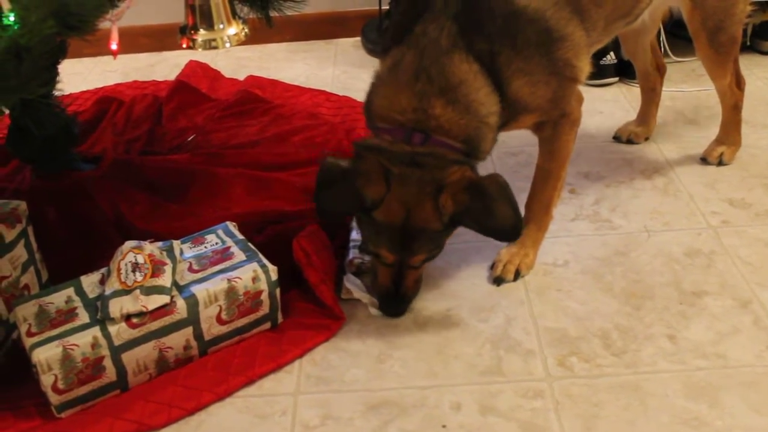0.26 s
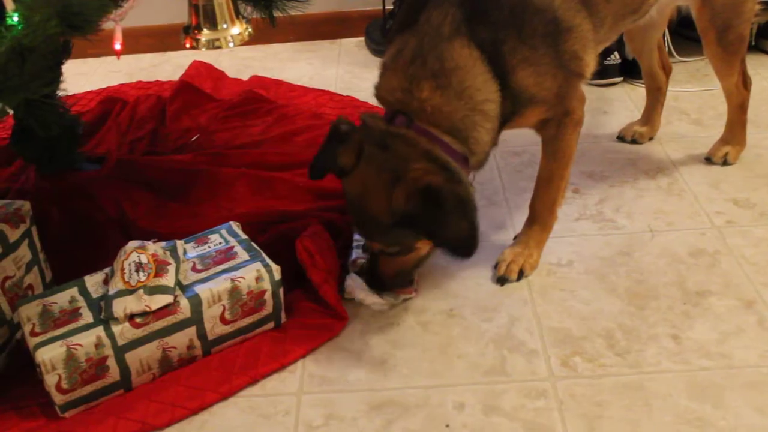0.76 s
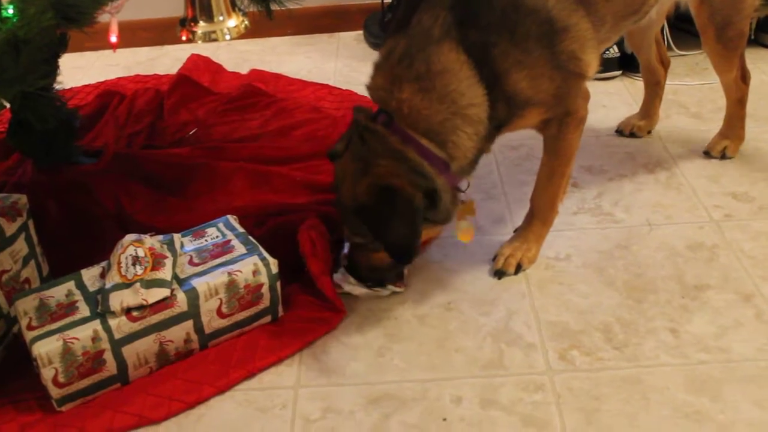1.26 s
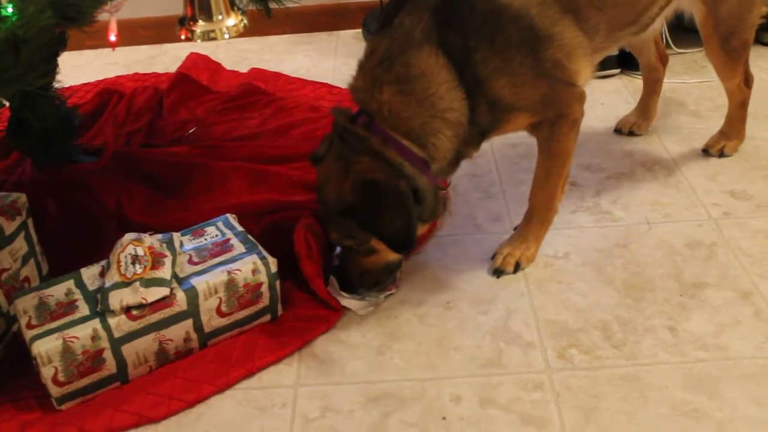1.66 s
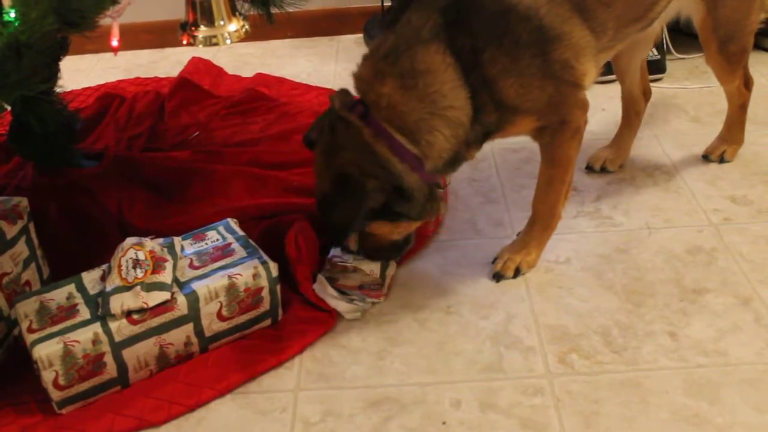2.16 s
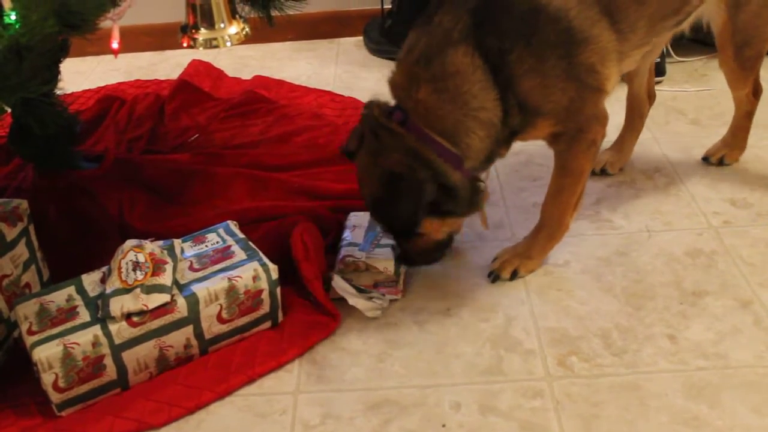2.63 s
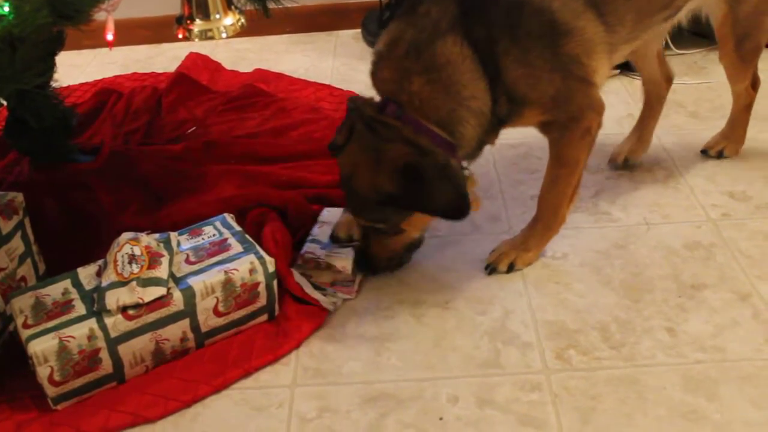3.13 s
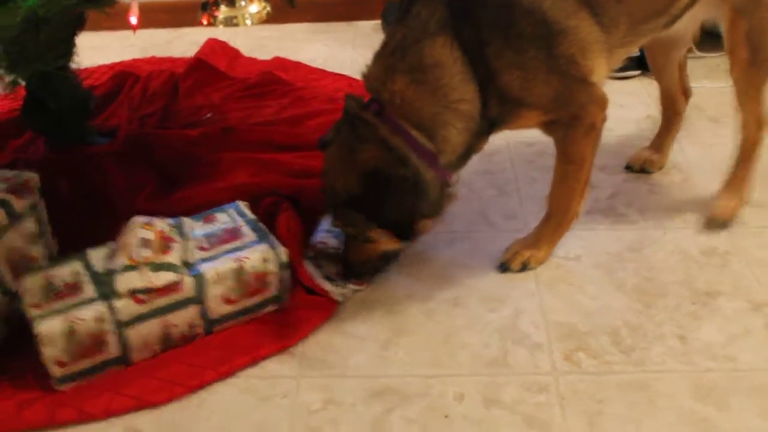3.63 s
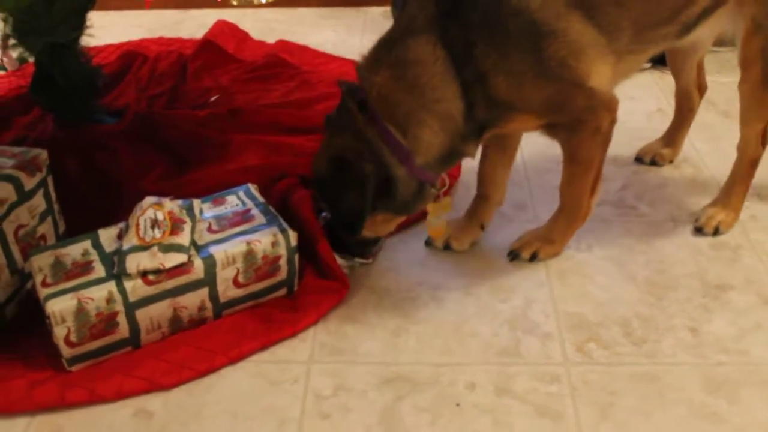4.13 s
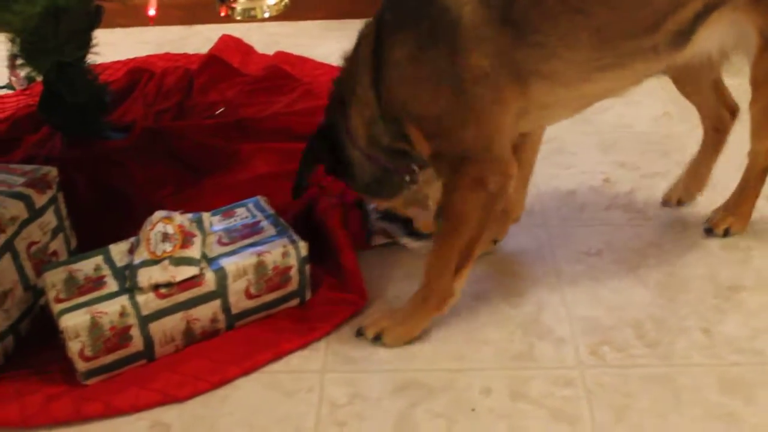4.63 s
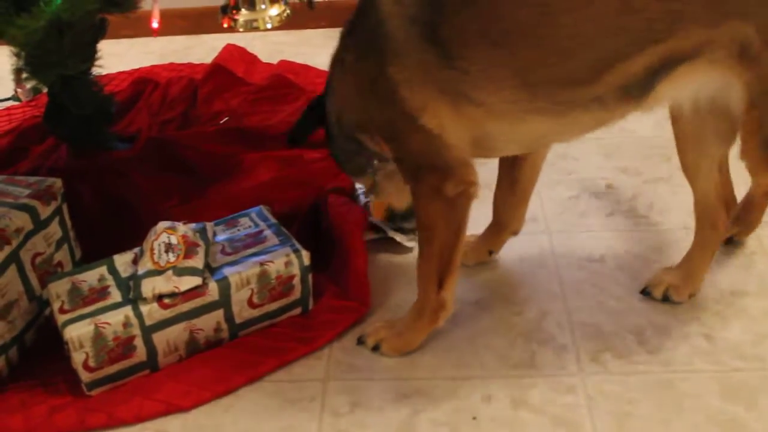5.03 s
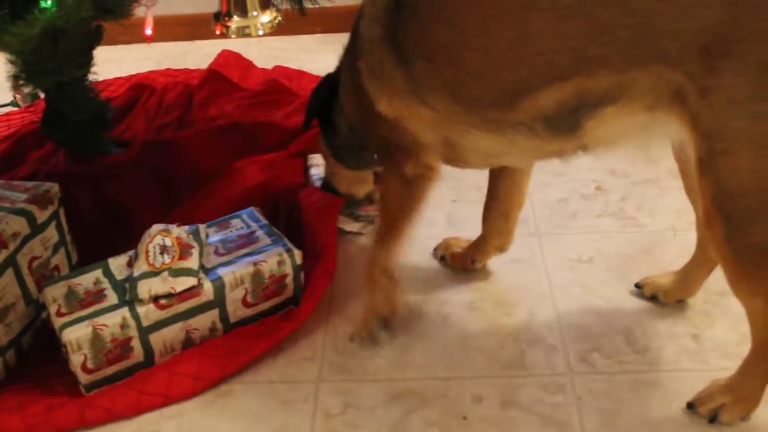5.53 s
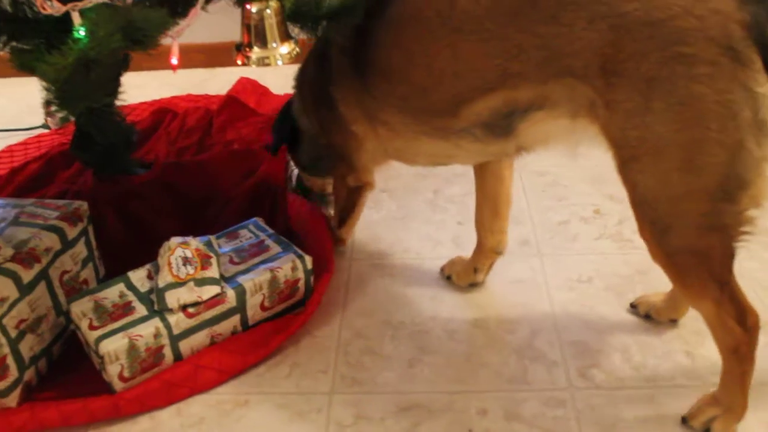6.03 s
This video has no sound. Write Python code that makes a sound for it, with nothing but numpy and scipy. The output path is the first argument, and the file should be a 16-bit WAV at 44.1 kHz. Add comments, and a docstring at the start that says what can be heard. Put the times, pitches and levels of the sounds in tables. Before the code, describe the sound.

Close in a hard, tiled room, a dog worries a wrapped gift. Faint ticks come first, then a crisp burst of paper snaps, a much louder hard pop, and looser crackles and rustles. Tiny collar tags clink brightly between them, with a few soft low thumps. Short echoes follow, over quiet room air and faint hum.

```python
"""Paper snaps and crinkles as a dog noses and bites a wrapped parcel on a tiled floor. Each snap is an impulse
with a floor reflection, a noise rattle and a panel resonance; crinkle is a random train of tiny folds. Two
metal collar tags clink as damped modes, and soft low thumps sound. A hard room adds distinct echoes and a tail
of nearly half a second, over filtered-noise hush and mains hum."""
import sys
import numpy as np
from scipy import signal
from scipy.fft import rfft, irfft
from scipy.io import wavfile

SR = 44100
rng = np.random.default_rng(int(sys.argv[2]) if len(sys.argv) > 2 else 0)


def dump(signal):
    """Clip the signal to [-1, 1] and save it as 16-bit WAV at the path in sys.argv[1]."""
    limited = np.clip(np.atleast_2d(signal).T, -1, 1)
    pcm = np.round(limited * 32767).astype(np.int16)
    wavfile.write(sys.argv[1], SR, pcm)


N = 276948  # samples

# Paper snaps, knocks of the parcel and dry ticks: t/s, direct peak/dB, ring f/Hz, ring share/dB,
# bass slope (positive thins the bass)/dB per octave, treble slope/dB per octave, room send/dB
SNAP_EVENTS = [(.0044,-33.5,990,-12,-6,-24,7.5),(.168,-38.5,530,-12.5,9,-4,5),(.381,-42,2020,-1,0,4.5,-3),(.410,-36,3540,-10,-5,14,-7),(.4294,-41,1130,-6,-10,-2,7),(.627,-38,437,-10,-11,-13,-1),(0.6385,-45,1150,3,1,-22,7),(.6866,-41,1210,-10,-5,11,5),(.7544,-36.5,649,-21,4,7,6),(.8854,-34.5,960,-8,4,10,-10),(1.002,-31.5,750,-5.5,-13,15,8),(1.1914,-42,1970,0,1,7,-1),(1.2433,-26,2900,-19,22,3,11.5),(1.2504,-35,4470,-16,5,2,-6),(1.2647,-29,2300,-14,6,9.5,7),(1.3846,-34.5,2800,0,9,13,-8),(1.4098,-30.5,2320,-9,22,0.5,7),(1.419,-28,3200,4,16,11.5,2.5),(1.5503,-12.5,2210,-18,11,3.5,13.5),(1.5654,-10.5,4580,-6,-2,2,13.5),(1.5784,-10,2870,-15,-2,6,10.5),(1.5868,-17,1110,-5.5,5,-3,2),(1.6104,-17.5,3600,-18,5,9,3.5),(1.8154,-43,1230,-14,4,4,14),(1.8534,-24,2300,-30,8,6,4),(1.8843,-30.5,3470,-30,10,6,16),(1.9566,-29.5,2790,-14,13,3,4),(1.9668,-35,2970,-18,10,6,3),(2.0452,-29,730,-21.5,-1,3,11),(2.2726,-32.5,4100,7.5,-8,14.5,9.5),(2.2888,-31.5,527,-14,-8,0,8),(2.3071,-32,2320,-17,2,0,10),(2.3181,-25,2300,-6,-6,10,4),(2.378,-27,960,-11,-1,-15,9),(2.3936,-12.5,1140,-5.5,-7.5,7,13),(2.4253,4,906,-15.5,-3,-1,-1.5),(2.4338,-8.5,3070,1.5,1,-9,6),(2.4475,-7,895,-20,1.5,-17,13.5),(2.6294,-32.5,884,-16,-1,-1,13.5),(2.7437,-28.5,3400,-2,15,0,6),(2.8877,-27,3770,4,2,3,6),(2.9583,-35.5,1870,-1,1,-10,-8),(3.0751,-26,701,-12,4,-4,7),(3.079,-17.5,947,-8,-9,1.5,4),(3.0953,-16.5,980,4,-13,16,0.5),(3.1132,-15,920,-14,3,5,5),(3.1576,-8.5,1960,-18.5,2,-12,6),(3.2374,-31,1650,-11,3,0,10),(3.2895,-25.5,3500,-5,-5,0,5.5),(3.3609,-14.5,506,-15,-8,1,6.5),(3.4074,-30,1260,-2,-1,-15,-2),(3.4639,-47,482,-20,2,-5,4),(3.5444,-39.5,523,-19,4,7,19.5),(3.681,-35.5,3100,-9,-1,1,13),(3.7579,-29,736,-19,-6,-13,0),(3.7883,-30,853,-8,-28,-5,-22),(3.7978,-26.5,1630,-3,-9,-10,-31),(3.898,-28,1750,-16.5,3,-4,-12),(3.955,-42.5,705,-11.5,-10.5,-11,13.5),(4.1414,-31,3630,-8,6,-9,15),(4.151,-15,1790,-18,11,-7.5,8),(4.1659,-23.5,2300,-10,3,-5,5),(4.4378,-39,2360,-22,0,-19,18.5),(4.4632,-25.5,1930,-20,7,-10,11),(4.6468,-38,1300,-11,1,-7,-2),(4.7208,-14.5,2170,-35,-5,4.5,7),(4.9114,-47,2780,-5.5,3,-7,15.5),(5.1887,-26,1790,-24,23,-5,14),(5.3201,-57,2850,-10,-2,-8,12),(5.6342,-32,1560,-20,6,2,10),(5.656,-21,1910,-14,-3,-3.5,10.5),(5.6749,-22.5,2350,-33,-2,1,3),(5.8188,-33,4500,-12,5,8,-1),(5.8312,-22,3440,-21,0,8,-13),(5.848,-28,4540,-26,10,6,-1),(5.8939,-34,2560,-6.5,-11,7,15),(5.9369,-25,3440,-11,-1,3,3),(5.9418,-12.5,3470,-5.5,5,-3,1),(6.108,-46,3460,-15,2,7,0),(6.136,-29.5,3500,-20,3,7,18)]
NEUTRAL_HZ = 2500  # pivot of every spectral tilt


def undb(db):
    """Level to amplitude ratio: 20 dB is a factor of ten."""
    return 10 ** (np.asarray(db) / 20)


def unit(x):
    """Normalise the signal power: rms 1."""
    return x / np.sqrt(np.mean(x ** 2))


def band(x, hz, width_hz):
    """Band-pass filter whose edges lie geometrically about the centre."""
    low = np.sqrt(hz ** 2 + width_hz ** 2 / 4) - width_hz / 2
    high = min(low + width_hz, .45 * SR)
    return signal.sosfilt(signal.butter(2, [low, high], "bandpass", fs=SR, output="sos"), x)


def add(track, s, piece):
    """Linear superposition of a piece on the track, starting at s seconds."""
    i = max(int(s * SR), 0)
    track[i:i + len(piece)] += piece[:N - i]


def tilt(hz, per_octave_db):
    """Spectral tilt: level change in dB, linear in octaves from the neutral pitch."""
    return per_octave_db * np.log2(hz / NEUTRAL_HZ)


def two_slope_tilt(hz, bass_slope, treble_slope):
    """Spectral tilt with separate slopes below and above the neutral pitch."""
    return tilt(hz, bass_slope if hz < NEUTRAL_HZ else treble_slope)


def snaps(floor_ms=1.36, floor_db=-18.0, ring_q=4.36):
    """Impulsive release, tile reflection, rattle and panel resonance; returns direct sound and room send."""
    # Pass bands of a snap: f/Hz, width/Hz
    snap_bands = [(370, 280), (810, 2640), (1700, 2180), (3300, 2620), (6400, 2940), (12000, 36000)]
    # Share of each band before tilt: level/dB
    snap_shares = [-40, -20.5, -7, -5, -10, -11]
    rattle, rattle_ms = .5, 1.6  # amplitude share, time to fall by 1 / e
    direct, room_send = np.zeros(N), np.zeros(N)
    t = np.arange(2048) / SR
    bounce = int(floor_ms * SR / 1000)
    noises = rng.standard_normal((len(SNAP_EVENTS), len(t)))
    for event, noise in zip(SNAP_EVENTS, noises):
        s, db, ring_hz, ring_db, bass_slope, treble_slope, send_db = event
        # dividing by the root of the envelope's energy makes the share independent of rattle length
        kick = rattle * noise * np.exp(-t * 1000 / rattle_ms) / np.sqrt(rattle_ms * SR / 2000)
        kick[[0, bounce]] += np.sign(noise[0]) * undb([0, floor_db])
        snap = np.zeros(len(t))
        for k, ((hz, width), share_db) in enumerate(zip(snap_bands, snap_shares)):
            # alternating signs join neighbouring bands without a hole
            sign = (-1) ** k
            # narrow bands need more gain for the same peak
            gain = undb(share_db + two_slope_tilt(hz, bass_slope, treble_slope)) / width
            snap += sign * gain * band(kick, hz, width)
        snap += undb(ring_db) * ring_q / ring_hz * band(kick, ring_hz, ring_hz / ring_q)
        snap *= undb(db) / np.max(np.abs(snap))
        add(direct, s, snap)
        add(room_send, s, snap * undb(send_db))
    return direct, room_send


def crinkle(most_db=9.0):
    """Random impulse train: dense folds of exponentially scattered level excite the paper's bands."""
    # Fold activity before band shares: t/s, level/dB, spectral slope/dB per octave
    activity = [(0,-64,-6),(.3,-67,-2.8),(.63,-62,-2.7),(1.0,-60.5,-1),(1.2,-63,-1),(1.75,-59,-0.5),(2.239,-73.5,-7),(2.85,-59,-3.5),(3.5,-50.5,-1),(3.84,-64,-2.5),(4.1,-53.5,1),(4.42,-58,-0.5),(4.75,-53,-0.5),(4.96,-63,-4),(5.4,-51.5,0.5),(5.75,-57,0.5),(6.12,-46,0.5),(6.28,-44.5,-1.5)]
    # Pass bands of folding: f/Hz, width/Hz, rate/folds per second, mean scatter of size/dB
    fold_bands = [(2620, 3350, 1500., 2.5), (860, 1070, 900., 0.5), (7500, 4700, 900., 0.5),
                  (337, 276, 540, 2.5), (9300, 8300, 72, 24)]
    # Share of each fold band: level/dB
    fold_shares = [-1, -3.5, -7.5, -12.5, -16]
    s, db, slope = np.transpose(activity)
    t, after_snaps = np.arange(N) / SR, settling()
    paper = np.zeros(N)
    for (hz, width, per_s, scatter_db), share_db in zip(fold_bands, fold_shares):
        chance, size = rng.random((2, N))
        size_db = np.minimum(-scatter_db * np.log(size + 1e-9), most_db)
        polarity = np.sign(chance * SR / per_s - .5)
        folds = (chance < per_s / SR) * undb(size_db) * polarity
        steady = undb(np.interp(t, s, db + tilt(hz, slope)))
        envelope = steady + nudging(hz) + after_snaps
        paper += unit(band(folds, hz, width)) * envelope * undb(share_db)
    return paper


def settling():
    """Exponential relaxation: extra folding after every snap dies away as the paper settles."""
    settle_db, settle_s = -22.5, 0.013  # level relative to the snap's peak, time to fall by 1 / e
    envelope, t = np.zeros(N), np.arange(SR // 2) / SR
    for s, db, *_ in SNAP_EVENTS:
        add(envelope, s, undb(db + settle_db) * np.exp(-t / settle_s))
    return envelope


def nudging(hz):
    """Amplitude envelope of folding near a pitch: nose and paw give a linear swell, then exponential decay."""
    # Nudges before fold-band shares: start t/s, swell t/s, level/dB,
    # bass slope (positive thins the bass)/dB per octave, treble slope/dB per octave
    nudge_events = [(.625,0.0057,-59,-10,-7),(0.851,0.09,-79,-8.5,-7),(1.85,0.12,-71,19,1),(1.9,0.032,-70,-7,13),(2.06,.08,-50,1,-2),(2.28,0.15,-40,-3,-1),(2.428,0.077,-22.5,-2,-22),(2.9,0.082,-56,13,-2),(3.09,0.024,-50,-2.5,-2),(3.3,0.081,-43,-5,-21),
                    (4.17,0.009,-56.5,-7,0),(4.8,0.062,-51.5,7,1.5),(4.978,0.044,-45.5,4,-5),(5.08,0.076,-64.5,-7,-17),(5.185,0.024,-44,16,-8),(5.368,0.013,-63,-1,1),(5.768,0.038,-45.5,-0.5,5.5),(5.949,0.046,-38,-1.5,-1),(6.168,0.044,-42,1,2.5)]
    fall_s = 0.038  # time to fall by 1 / e after the swell
    envelope, t = np.zeros(N), np.arange(SR // 2) / SR
    for s, swell, db, bass_slope, treble_slope in nudge_events:
        rise = np.minimum(t / max(swell, .005), 1)
        fall = np.exp(-np.maximum(t - swell, 0) / fall_s)
        add(envelope, s, undb(db + two_slope_tilt(hz, bass_slope, treble_slope)) * rise * fall)
    return envelope


def tags(damp_ms=6.7):
    """Modal vibration: each blow rings the same modes of thin metal tags until the fur damps them."""
    # Clinks: t/s, free ringing before fur damps it t/s, blow on first tag level/dB,
    # its 14 kHz modes over that level/dB, blow on second tag level/dB
    clinks = [(.411, 0.14, -59, -10, -49.5), (.618, 0.076, -64, 12, -77), (1.002, 0.12, -43, 0, -66),
              (1.037, 0.082, -67, -5, -46.5), (1.833, 0.036, -47, -2, -55), (1.887, 0.14, -75, 20, -47),
              (1.914, 0.019, -50, -12, -46), (2.08, 0.1, -60, -8, -60), (2.327, 0.041, -38.5, -11, -63),
              (2.687, .042, -62, -12, -71), (3.14, 0.14, -39.5, -9, -46), (3.4855, 0.043, -38.5, -12, -71),
              (3.527, 0.17, -72, 13.5, -45), (4.724, 0.12, -35, 0, -63), (4.797, .056, -44, -8, -55),
              (4.855, .055, -52, -8, -64), (5.465, 0.2, -54, 0, -59), (5.822, 0.013, -32.5, -10, -46),
              (5.839, .02, -46, -11, -58), (5.932, 0.094, -46, -1, -50), (6.148, 0.044, -28.5, -6, -46),
              (6.208, .16, -36, -18, -57)]
    # Modes, a row each for first tag, second tag, first tag near 14 kHz, either tag near 7 kHz: f/Hz
    mode_hz = [
        [7884],
        [12350, 12420, 10010],
        [14390, 14680, 13550],
        [6880, 6761],
    ]
    # Strength of each mode, in the same rows: level/dB
    mode_levels = [
        [0],
        [0, -11, -16],
        [-2, -3, -15],
        [-2, -4],
    ]
    # Time for each mode to fall by 60 dB, in the same rows: t/s
    mode_t60 = [
        [.6],
        [.36, .3, .5],
        [.2, .2, .15],
        [.45, .5],
    ]
    low_db = -13  # modes near 7 kHz relative to the harder of the two blows
    metal, t = np.zeros(N), np.arange(SR // 2) / SR
    for s, free, first_db, high_db, second_db in clinks:
        damped = np.exp(-np.maximum(t - free, 0) * 1000 / damp_ms)
        strike = first_db, second_db, first_db + high_db, max(first_db, second_db) + low_db
        for db, *group in zip(strike, mode_hz, mode_levels, mode_t60):
            for hz, mode_db, t60 in zip(*group):
                # the tag twists as it swings, so each mode flutters on its own
                flutter_db = 2.5 * np.interp(t, np.arange(40) / 80, rng.standard_normal(40))
                fade = damped * np.exp(-np.log(1000) * t / t60)
                tone = np.sin(2 * np.pi * (hz * t + rng.random()))
                add(metal, s, undb(db + mode_db + flutter_db) * fade * tone)
    return metal


def thumps(rise_ms=5.4):
    """Damped oscillation: soft heavy contacts give short low thumps."""
    # Thumps: t/s, level before the rise and decay/dB
    contacts = [(0.429, -57), (1.579, -65), (2.428, -48), (3.079, -62), (3.348, -47), (3.799, -41),
                (4.16, -55), (4.749, -47), (5.419, -63), (5.949, -38)]
    thump_hz, t60_s = 73.5, 0.062
    low, t = np.zeros(N), np.arange(SR // 2) / SR
    envelope = (1 - np.exp(-t * 1000 / rise_ms)) * np.exp(-np.log(1000) * t / t60_s)
    swing = envelope * np.sin(2 * np.pi * thump_hz * t)
    for s, db in contacts:
        add(low, s, undb(db) * swing)
    return low


def room(x, gap_ms=2.94, build_ms=1.67):
    """Convolution with an impulse response: distinct wall echoes and a diffuse tail decaying band by band."""
    # Diffuse bands: f/Hz, time to fall by 60 dB t/s, relative level/dB
    decay_bands = [(109, 0.15, -2.5), (262, 0.34, -2.5), (492, 0.28, -0.2), (1002, 0.45, -0.77),
                   (2000, 0.38, 2.5), (3670, 0.38, -1), (7400, 0.43, -10), (16100, 0.18, 7.5)]
    # First distinct echoes: delay t/s, level/dB
    walls = [(0.012, -30), (0.0228, -25), (0.033, -23.5)]
    t = np.arange(SR) / SR
    tail = np.zeros(SR)
    for hz, t60, db in decay_bands:
        noise = unit(band(rng.standard_normal(SR), hz, 0.84 * hz))
        # compensate for bandwidth and decay time, so the level sets energy per Hz
        tail += undb(db) * noise * np.exp(-np.log(1000) * t / t60) * np.sqrt(hz / t60)
    tail *= 1 - np.exp(-np.maximum(t - gap_ms / 1000, 0) / (build_ms / 1000))
    tail /= np.sqrt(np.sum(tail ** 2))  # energy 1
    for s, db in walls:
        tail[int(s * SR)] += undb(db)
    return signal.fftconvolve(x, tail)[:N]


def colour(points):
    """Spectral shaping: white noise weighted in the frequency domain, then brought to rms 1."""
    hz, db = np.transpose(points)
    f = np.maximum(np.arange(N // 2 + 1) * SR / N, 1)
    gain = undb(np.interp(np.log(f), np.log(hz), db))
    return unit(irfft(rfft(rng.standard_normal(N)) * gain, N))


def hush():
    """Stationary noise and a pure tone: quiet indoor air with a faint mains hum."""
    # Noise spectrum: f/Hz, relative level per Hz/dB
    air_spectrum = [(15, -52), (25, -37), (64, 0.5), (114, 8.5), (309, 12.5), (363, 0), (863, -53),
                    (1020, -14.5), (1520, -31), (2910, 2), (4740, -3.5), (12500, -13.5), (16000, -13)]
    air_db, hum_hz, hum_db = -59.5, 119.4, -72  # rms levels
    air = undb(air_db) * colour(air_spectrum)
    hum = undb(hum_db) * np.sqrt(2) * np.sin(2 * np.pi * hum_hz * np.arange(N) / SR)
    return air + hum


def scene():
    """Superposition of the direct sources, their shared reverberation and the background."""
    snap_direct, snap_send = snaps()
    paper, metal = crinkle(), tags()
    paper_send_db, metal_send_db = -3.5, -16
    echo = room(snap_send + undb(paper_send_db) * paper + undb(metal_send_db) * metal)
    return (snap_direct + thumps() + paper + metal + echo + hush())[None]


def record(dry):
    """Band-limiting and saturation: the microphone loses deep bass, the recorder rounds peaks and cuts the top."""
    mic_low_hz, top_hz = 30.4, 16000
    ceiling = .8  # amplitude that the loudest peaks bend towards
    heard = signal.sosfilt(signal.butter(1, mic_low_hz, "highpass", fs=SR, output="sos"), dry)
    rounded = ceiling * np.tanh(heard / ceiling)
    return signal.sosfilt(signal.ellip(10, .2, 70, top_hz, fs=SR, output="sos"), rounded)


dry = scene()
out = record(dry)
dump(out)
```